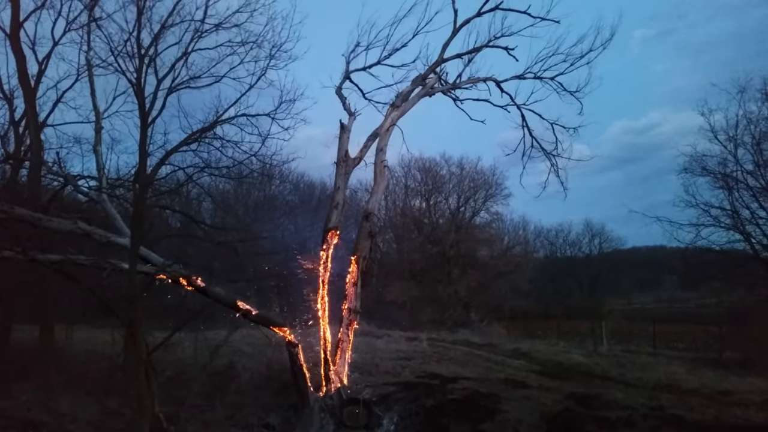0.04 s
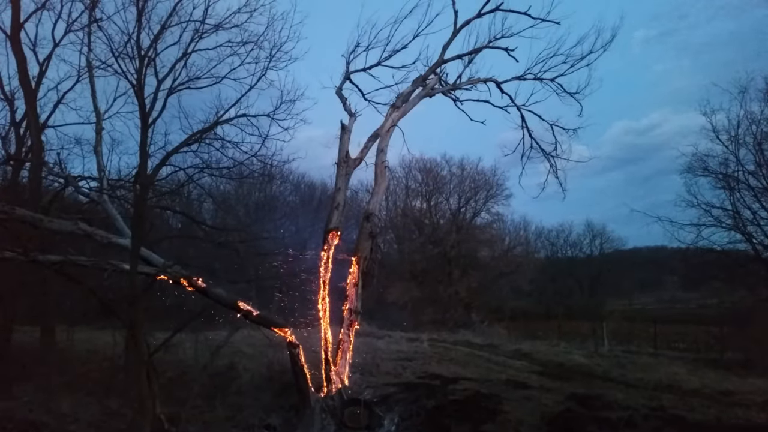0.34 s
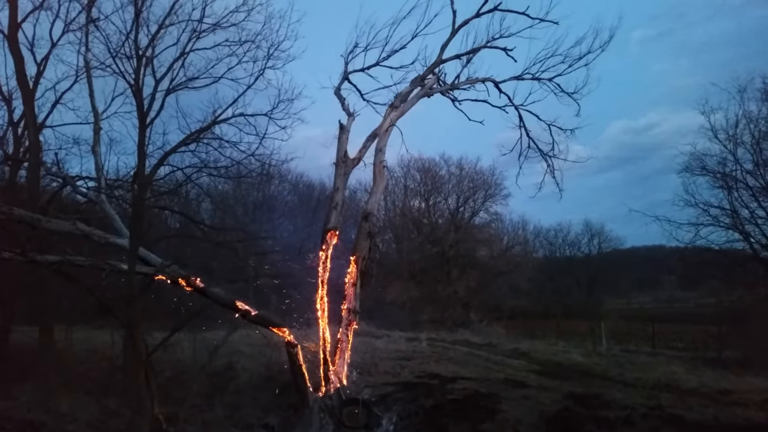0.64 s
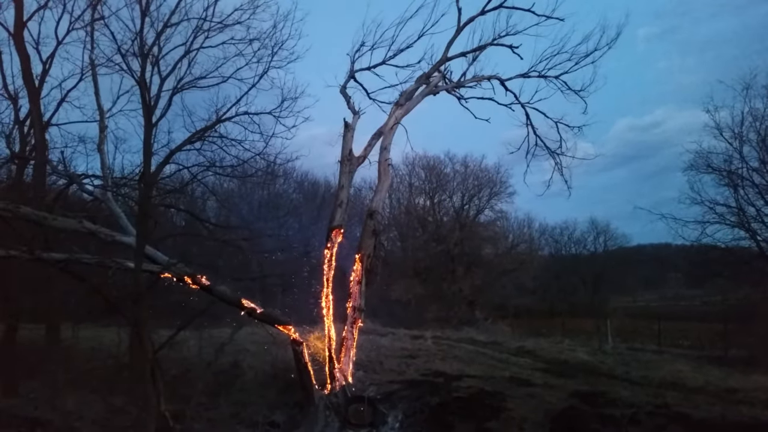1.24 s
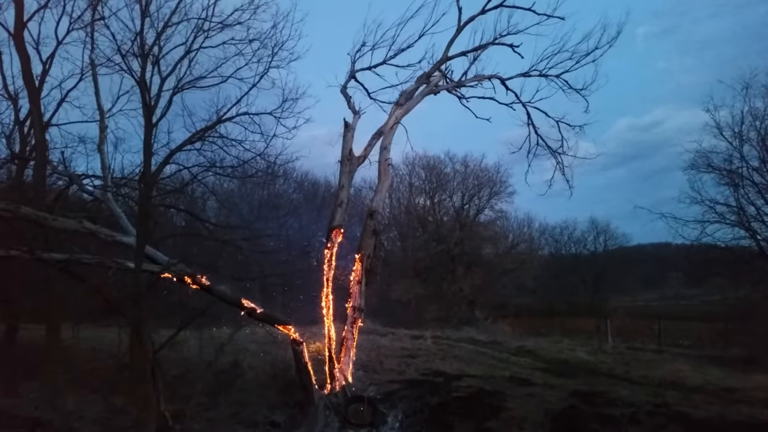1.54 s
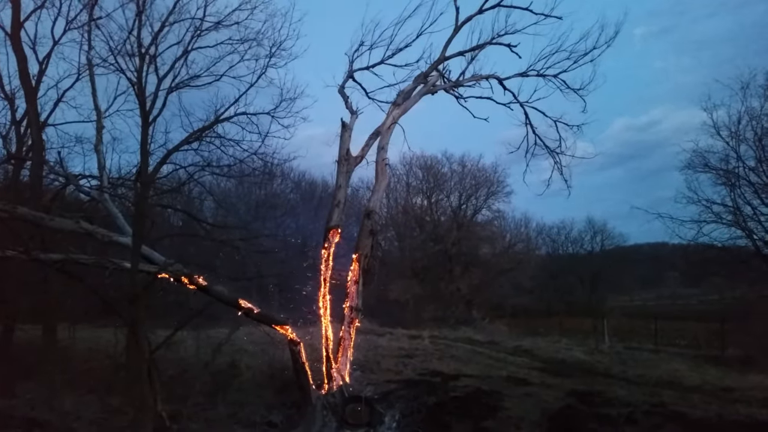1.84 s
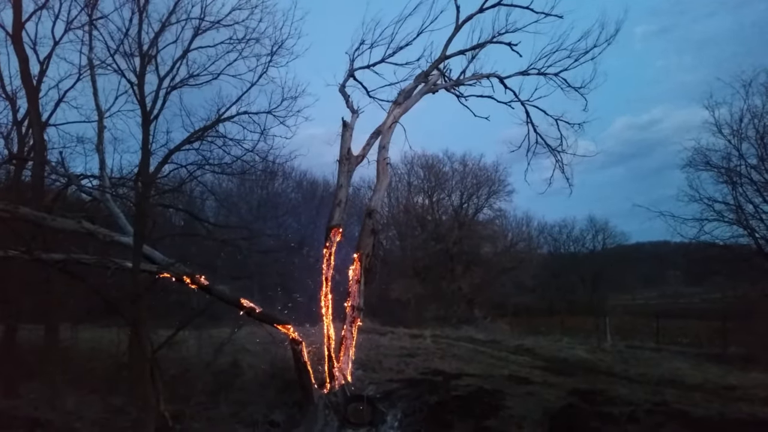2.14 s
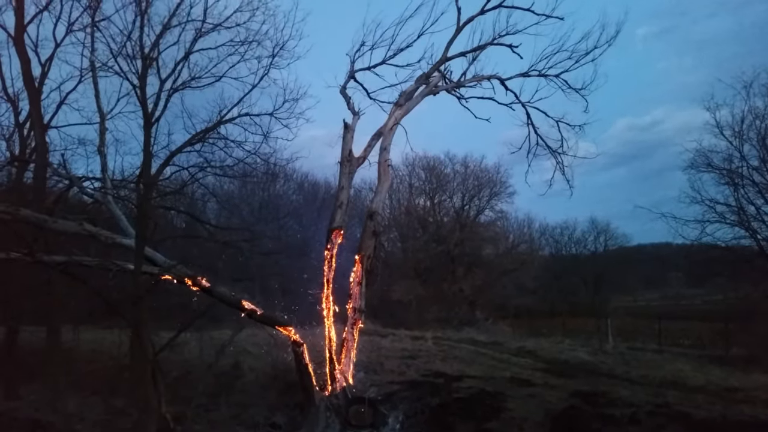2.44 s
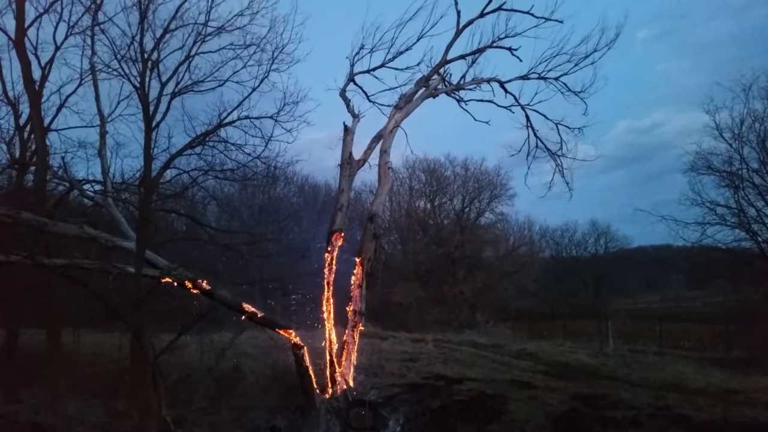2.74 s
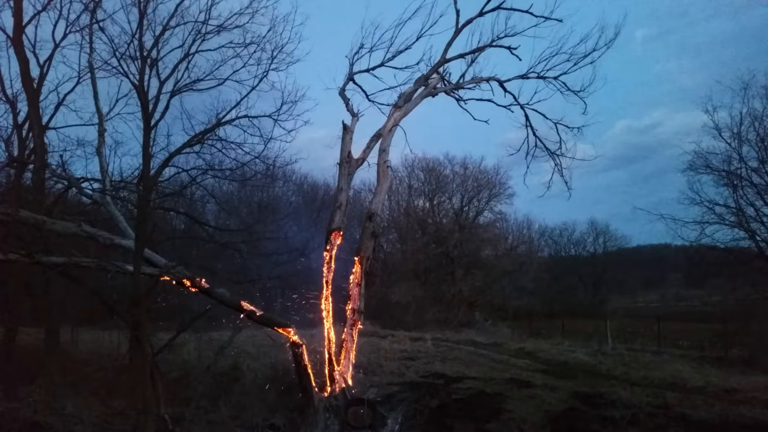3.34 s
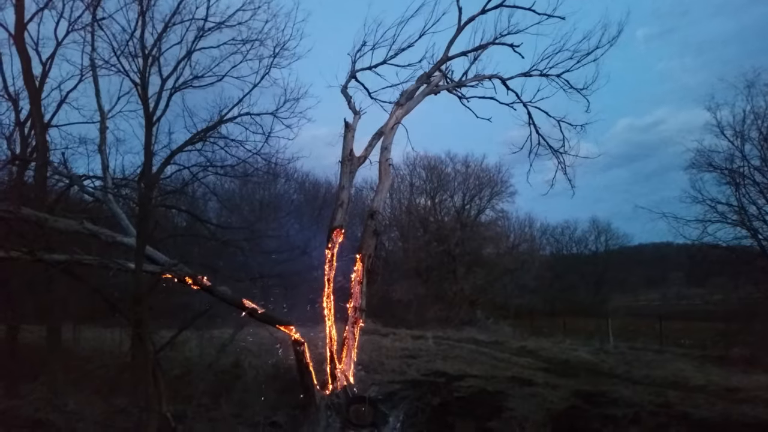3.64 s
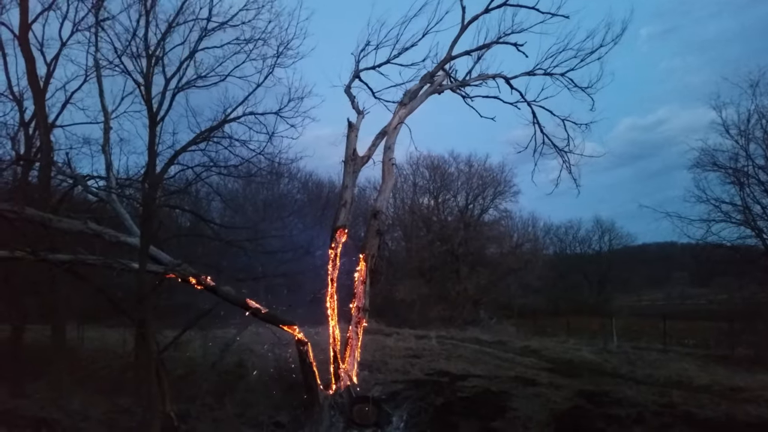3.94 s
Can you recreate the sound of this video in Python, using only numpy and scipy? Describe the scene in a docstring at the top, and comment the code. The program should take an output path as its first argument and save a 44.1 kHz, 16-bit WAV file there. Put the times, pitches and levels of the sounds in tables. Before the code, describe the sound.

Gusty wind rumbles on the microphone and eases, while a burning tree crackles faintly.

```python
"""An open field at dusk, where a dead tree smoulders. A gust buffets the two microphone ports with
rumble, rasping flaps and low thumps, then eases to a low rumble. The embers sizzle thinly and the
wood crackles now and then as it splits, brightest on the right. Behind them lie the soft rush of
the field and a narrow hiss on the left. One sharp tick sounds near the end."""
import sys
import numpy as np
from scipy import signal
from scipy.fft import rfft, irfft, next_fast_len
from scipy.io import wavfile
from scipy.ndimage import uniform_filter1d, minimum_filter1d, map_coordinates

SR = 44100
rng = np.random.default_rng(int(sys.argv[2]) if len(sys.argv) > 2 else 0)


def int16_out(signal):
    """Quantize to a 16-bit WAV file."""
    q = np.round(np.clip(np.atleast_2d(signal).T, -1, 1) * 32767)
    wavfile.write(sys.argv[1], SR, q.astype(np.int16))


N = 176400
SNAP_S = .0006  # decay time of an ember's pop and of a snap of wood


def wind(rumble_db=.5, eddy_db=3, lump_db=.68, flutter_db=1.0, tear_db=2):
    """Turbulence at each port: a rumble that fills out in the gust, and eddies that flare on its peaks."""
    # wind pressure on each port: time_s, level_db
    wind_left = [(0.03, -16), (.14, -17.5), (.3, -12.5), (.5, -16), (.58, -16), (.66, -12), (.73, -22.5),
                 (.84, -11.5), (.93, -21), (1.01, -14), (1.22, -24.5), (1.5, -23.5), (1.75, -19.5),
                 (2.08, -21.5), (2.3, -25), (2.38, -24.5), (2.58, -20.5), (2.8, -32), (2.9, -23.5),
                 (3.02, -28.5), (3.16, -22), (3.3, -24.5), (3.4, -20), (3.48, -24), (3.62, -18), (3.9, -22),
                 (3.99, -29.5)]
    wind_right = [(0.03, -13), (0.22, -11.5), (0.36, -21), (0.55, -11), (0.81, -14.5), (0.86, -22),
                  (0.95, -14), (1.32, -18.5), (1.41, -18.5), (1.44, -24.5), (1.55, -19), (1.76, -22.5),
                  (1.94, -27.5), (2.1, -17.5), (2.43, -20.5), (2.82, -24), (2.95, -16), (3.11, -36),
                  (3.16, -18), (3.31, -25.5), (3.45, -19.5), (3.49, -29.5), (3.82, -23.5), (3.99, -31.5)]
    # fast eddies at each port: time_s, level_db
    eddies_left = [(0, -34), (.14, -32.5), (.18, -55.5), (.3, -35.5), (.42, -33.5), (.5, -48.5),
                   (.66, -32.5), (.74, -61), (.84, -44), (.9, -51), (1.17, -44), (1.3, -66.5), (4, -51.5)]
    eddies_right = [(0.03, -38), (0.51, -45), (0.54, -30.5), (0.72, -36), (0.92, -46.5), (1.01, -39.5),
                    (1.31, -47.5), (1.35, -37), (1.41, -48.5), (1.81, -32.5), (1.91, -50.5), (2.1, -44),
                    (2.57, -50.5), (2.7, -41), (2.81, -54.5), (2.9, -50), (2.99, -55.5), (3.42, -38.5),
                    (3.46, -51.5), (3.78, -53.5), (3.91, -34.5), (3.99, -41.5)]
    # tone of the gust, the calm and the eddies: frequency_hz, gain_db
    gust_colour = [(15, -20.5), (28, -5), (42, -1.5), (75, 0.5), (120, 0), (175, -5), (300, -14),
                   (450, -23.5), (800, -47.5), (1600, -74.5), (4000, -120)]
    calm_colour = [(15, -26.5), (30, -12.5), (58, -0.5), (88, 1), (150, -4), (220, -11.5), (300, -16.5),
                   (480, -34.5), (1600, -78.5), (4000, -120)]
    eddy_colour = [(120, -5), (300, 3), (500, -4), (800, -7.5), (1500, -24.5), (2200, -33.5), (3200, -52),
                   (6000, -70.5), (10000, -100)]
    wind_level = np.array([curve(wind_left), curve(wind_right)])
    eddy_level = np.array([curve(eddies_left), curve(eddies_right)])
    gust = np.clip((wind_level + 21) / 4, 0, 1)  # crossfade from calm to gust over 4 dB, from -21 dB up
    pressure = np.sqrt(gust) * noise(gust_colour) + np.sqrt(1 - gust) * noise(calm_colour)
    pressure = steadied(pressure, span_s=.13)
    lumps = wobble(35)
    rumble = unit(pressure * amp(lump_db * lumps)) * amp(wind_level + rumble_db)
    flare = unit(amp(flutter_db * lumps + tear_db * np.clip(pressure, -2, 2)))
    return rumble + turbulence(flare * amp(eddy_level + eddy_db), eddy_colour)


def flaps(gain_db=8, width_s=.0056, rasp_db=4.5):
    """Single eddies strike one port, each a brief rasping swell."""
    # eddy strikes: centre_s, level_db, side (-1 left, 1 right)
    strikes = [(0.044, -26, -1), (.065, -28, -1), (0.09, -22, 1), (0.095, -21, -1), (.123, -15, -1),
               (0.224, -27, -1), (.268, -28, -1), (0.356, -28.5, -1), (0.373, -20.5, -1), (0.412, -25, -1),
               (.44, -28.5, -1), (.55, -27.5, 1), (0.572, -18.5, 1), (0.607, -25, 1), (0.634, -31.5, -1),
               (0.682, -26.5, 1), (.685, -25.5, -1), (0.695, -35.5, 1), (0.789, -32.5, -1),
               (0.837, -35.5, -1), (0.857, -30, -1), (0.932, -33.5, -1), (1.016, -35.5, -1),
               (1.361, -38.5, 1), (1.804, -30, 1), (3.149, -40, -1), (3.674, -42.5, -1)]
    # tone of a flap: frequency_hz, gain_db
    flap_colour = [(60, -11), (200, 9.5), (320, 9), (500, 3), (1000, -10), (1500, -20), (2200, -28.5),
                   (3200, -44), (4300, -44.5), (5500, -67), (10000, -100)]
    t, swell = np.arange(N) / SR, np.zeros((2, N))
    for centre_s, level_db, side in strikes:
        swell[int(side > 0)] += amp(level_db + gain_db) * np.exp(-.5 * ((t - centre_s) / width_s) ** 2)
    rasp = unit(amp(rasp_db * wobble(300)))
    return turbulence(swell * rasp, flap_colour)


def thumps(pitch_hz=111, width_s=.0072):
    """Big eddies push and pull on one port: a low thump about two cycles long."""
    # big eddies: centre_s, level_db, side (-1 left, 1 right)
    pushes = [(0.091, -7.5, 1), (0.125, 3, -1), (0.509, -12.5, -1), (0.565, -5, 1), (0.727, -4.5, 1),
              (0.797, -15, 1)]
    t, out = np.arange(N) / SR, np.zeros((2, N))
    for (centre_s, level_db, side), phase in zip(pushes, rng.random(len(pushes))):
        swell = amp(level_db) * np.exp(-.5 * ((t - centre_s) / width_s) ** 2)
        out[int(side > 0)] += swell * np.cos(2 * np.pi * (pitch_hz * (t - centre_s) + phase))
    return out


def fire():
    """The smouldering tree: sizzle and crackles, with more top-end sparkle on the right."""
    # tone of the left sizzle, the left crackles and both on the right: frequency_hz, gain_db
    sizzle_left = [(2000, -5.5), (5000, -17), (6500, -13.5), (7800, -14), (8600, -23), (10200, -9),
                   (13500, -12), (15500, 0)]
    crackle_left = [(2000, -17.5), (5000, -9), (7800, -16.5), (8600, -22.5), (10200, -15), (13500, -13),
                    (15500, -16.5)]
    fire_right = [(2000, -20.5), (4600, -17.5), (5800, -32), (8600, -24.5), (10100, 0.5), (11300, 0.5),
                  (13200, -10.5), (14500, 1), (15600, 4)]
    embers, snaps = sizzle(), crackles()
    left = coloured(embers[0], sizzle_left) + coloured(snaps[0], crackle_left)
    right = coloured(embers[1] + snaps[1], fire_right)
    return np.array([left, right])


def sizzle(gain_db=8, pops_per_s=160, spread_db=3, grain_db=-5):
    """Embers give off a fine hiss, grainy with tiny pops of uneven size."""
    # strength of the sizzle: time_s, level_db
    strength = [(0, -73.5), (.3, -70.5), (.7, -67.5), (1.15, -66), (1.35, -62.5), (1.55, -65), (1.78, -62),
                (1.9, -65.5), (2.5, -68.5), (2.95, -69.5), (3.4, -69.5), (3.65, -66.5), (4, -69.5)]
    pops = (rng.random(N) < pops_per_s / SR) * amp(spread_db * np.minimum(rng.exponential(size=N), 4))
    t = np.arange(SR // 50) / SR
    grain_envelope = unit(signal.fftconvolve(pops, np.exp(-t / SNAP_S))[:N])
    smooth = rng.standard_normal((2, N))
    grains = amp(grain_db) * grain_envelope * rng.standard_normal((2, N))
    return amp(curve(strength) + gain_db) * (smooth + grains)


def crackles(gain_db=4.5, aftersnap_s=.0018, aftersnap_db=-5, scatter_s=.005, scatter_db=-14.5):
    """Wood splits in a snap and runs on into a weaker one, each with a short tail of scattered sound."""
    # splits in the wood: start_s, level_db, pan_db (left minus right)
    splits = [(.078, -53, -4), (0.117, -45.5, -3.5), (.189, -47.5, -2), (.208, -51.5, -3),
              (.639, -41.5, -3), (1.066, -48.5, 1), (1.207, -45, -1.5), (1.219, -34, -0.5),
              (1.324, -35.5, -0.5), (1.353, -39.5, -3), (1.545, -43, -0.5), (1.620, -44, -2.5),
              (1.679, -44, 1.5), (1.746, -35, 2), (1.752, -37.5, -3.5), (1.783, -37, -0.5), (1.789, -41, 0),
              (2.061, -33, -2), (2.241, -48.5, 12.5), (2.620, -43.5, -8)]
    power, t = np.zeros((2, N + SR)), np.arange(SR // 20) / SR
    snap = np.exp(-t / SNAP_S) + amp(scatter_db) * np.exp(-t / scatter_s)
    for (start_s, level_db, pan_db), chance in zip(splits, rng.random(len(splits))):
        for delay_s, drop_db in (0, 0), (aftersnap_s * (.5 + chance), aftersnap_db):
            start = round((start_s + delay_s) * SR)
            envelope = amp(level_db + drop_db + gain_db) * panned(pan_db) * snap
            power[:, start:start + len(t)] += envelope ** 2
    return np.sqrt(power[:, :N]) * rng.standard_normal((2, N))


def tick(start_s=3.4233, level_db=-19.5, decay_s=.00035, right_db=-3):
    """One dry tick, opposite in polarity on the two sides."""
    t = (np.arange(N) - round(start_s * SR)) / SR
    pulse = amp(level_db) * (t >= 0) * np.exp(-np.abs(t) / decay_s)
    return pulse * np.array([[-1], [amp(right_db)]])


def field_rush(gain_db=-49, sway_db=1.04):
    """The soft rush of air over the field, swaying slightly in level."""
    # strength of the rush: time_s, level_db
    strength = [(0, 5.5), (1.3, 2), (1.75, 1), (2.3, 0.5), (3, 0.5), (4, 2)]
    # tone of the rush: frequency_hz, gain_db
    rush_colour = [(150, -7.5), (500, 5), (1000, -3), (1500, -10.5), (2100, -15), (2900, -30.5),
                   (4800, -41.5), (6000, -48), (12000, -57)]
    return amp(gain_db + curve(strength) + sway_db * wobble(6.1)) * noise(rush_colour)


def narrow_hiss(gain_db=-67.5, pan_db=20):
    """A faint band of hiss around 4.6 kHz stands on the left."""
    # strength of the hiss: time_s, level_db
    strength = [(0, -4), (.5, -1.5), (1.2, 2), (2, 1), (3, 0.5), (4, 1.5)]
    # tone of the hiss: frequency_hz, gain_db
    hiss_colour = [(2500, -21), (3750, -14.5), (4150, -0.5), (4600, 2.5), (5100, -2), (5500, -26),
                   (9000, -30), (14000, -49.5)]
    return amp(gain_db + curve(strength)) * noise(hiss_colour) * panned(pan_db)


def turbulence(envelope, colour):
    """Air noise at the ports: it follows an envelope, then takes a colour, duller on the right."""
    # treble loss of the right port: frequency_hz, gain_db
    right_port = [(1500, -1.5), (2500, -4.5), (3500, -12), (5000, -19)]
    white = rng.standard_normal((2, N))
    left, right = coloured(white * envelope, colour) / np.std(coloured(white, colour))
    return np.array([left, coloured(right, right_port)])


def amp(db):
    """Decibels to gain."""
    return 10 ** (np.asarray(db) / 20)


def unit(x):
    """Scale to rms 1."""
    return x / np.sqrt(np.mean(x ** 2) + 1e-20)


def curve(points):
    """A fader move: (time_s, value) points joined into one value per sample."""
    return np.interp(np.arange(N) / SR, *np.transpose(points))


def wobble(knots_per_s):
    """A smooth random curve for each port."""
    position = np.arange(N) * knots_per_s / SR
    knots = rng.standard_normal((2, 2048))
    return np.array([map_coordinates(side, [position], mode="wrap") for side in knots])


def filtered(x, response):
    """Filter x by a gain given as a function of frequency."""
    size = next_fast_len(N + SR // 2)
    return irfft(rfft(x, size) * response(np.fft.rfftfreq(size, 1 / SR)), size)[..., :N]


def coloured(x, colour):
    """Equalise x with (frequency_hz, gain_db) points joined on a log axis."""
    points_hz, gain_db = np.transpose(colour)
    return filtered(x, lambda hz: amp(np.interp(np.log(hz + 1), np.log(points_hz + 1), gain_db)))


def noise(colour):
    """Coloured noise of rms 1, unrelated at the two ports."""
    return unit(coloured(rng.standard_normal((2, N)), colour))


def panned(pan_db):
    """Left and right gains of constant total power; positive is left."""
    gains = amp([[pan_db / 2], [-pan_db / 2]])
    return unit(gains)


def steadied(x, span_s):
    """Level out the slow chance swells of a noise."""
    power = uniform_filter1d(x ** 2, int(span_s * SR), axis=-1)
    return x / np.sqrt(np.abs(power) + 1e-6)


def scene():
    """Wind on the microphone over the field and the embers."""
    return wind() + flaps() + thumps() + field_rush() + narrow_hiss() + fire() + tick()


def record(dry):
    """A limiter catches the biggest peaks, then the very top of the treble is cut off."""
    ceiling, window, top_hz = .83, int(.012 * SR), 15850
    gain = ceiling / np.maximum(np.abs(dry), ceiling)
    held_gain = minimum_filter1d(gain, window, axis=-1)
    limited = dry * uniform_filter1d(held_gain, window, axis=-1)
    return filtered(limited, lambda hz: hz < top_hz)


dry = scene()
out = record(dry)
int16_out(out)
```